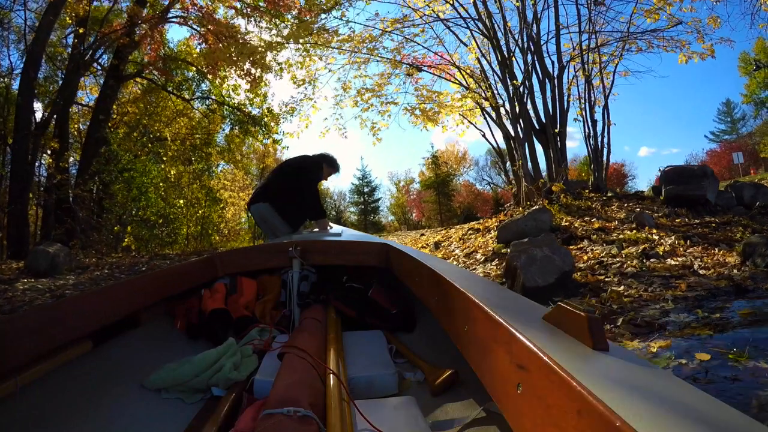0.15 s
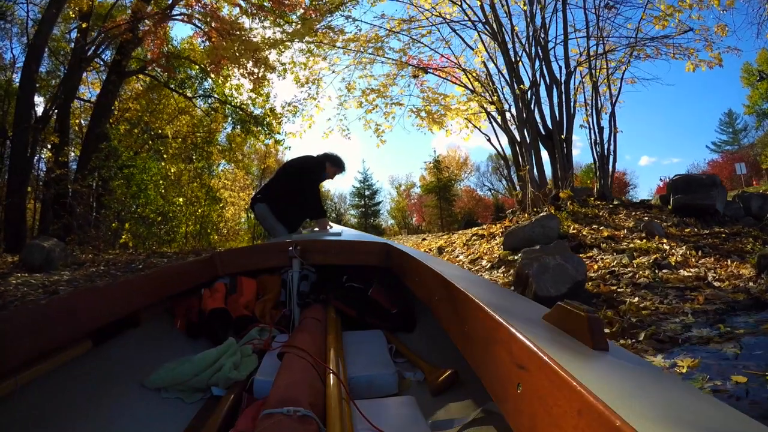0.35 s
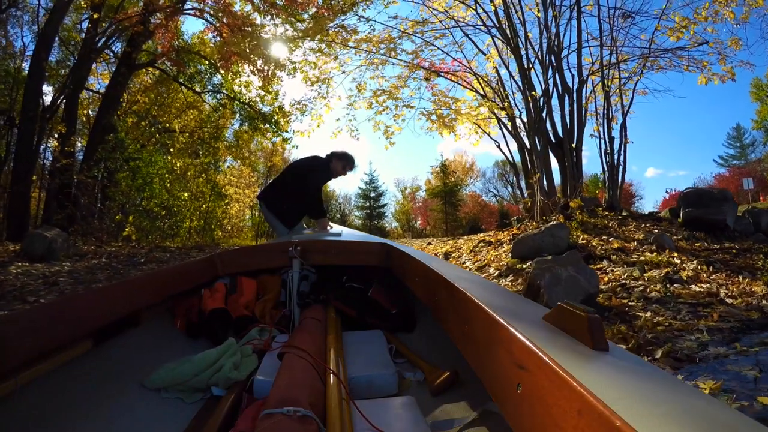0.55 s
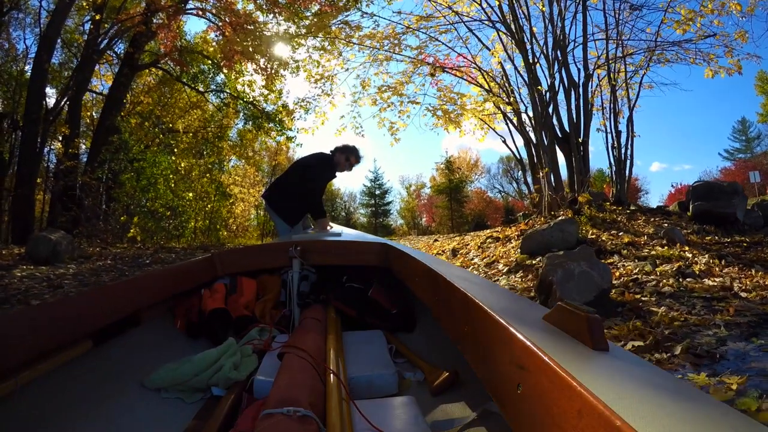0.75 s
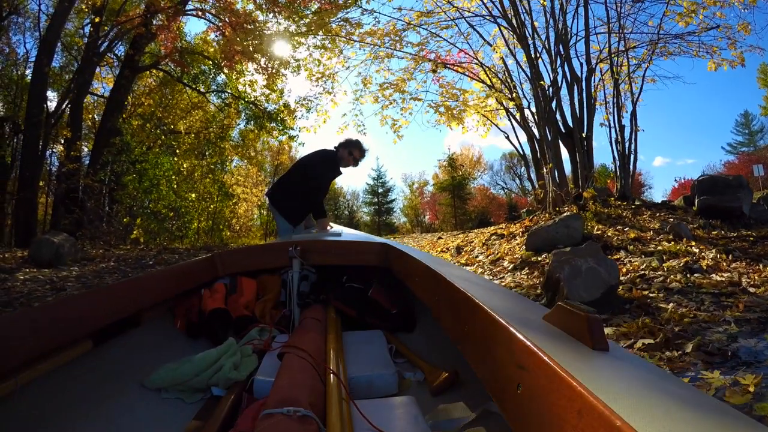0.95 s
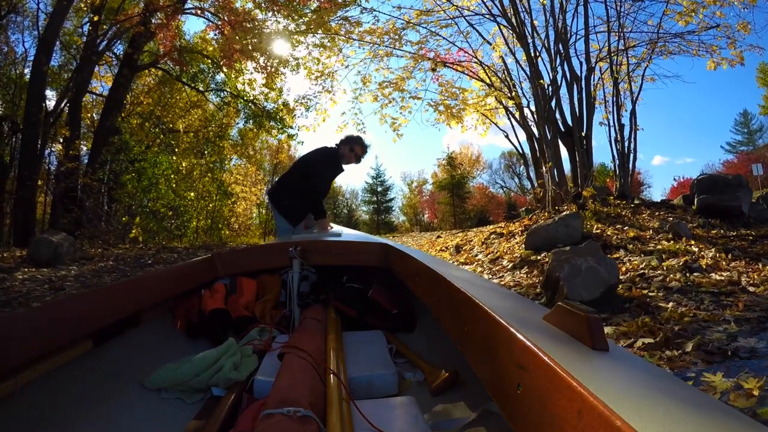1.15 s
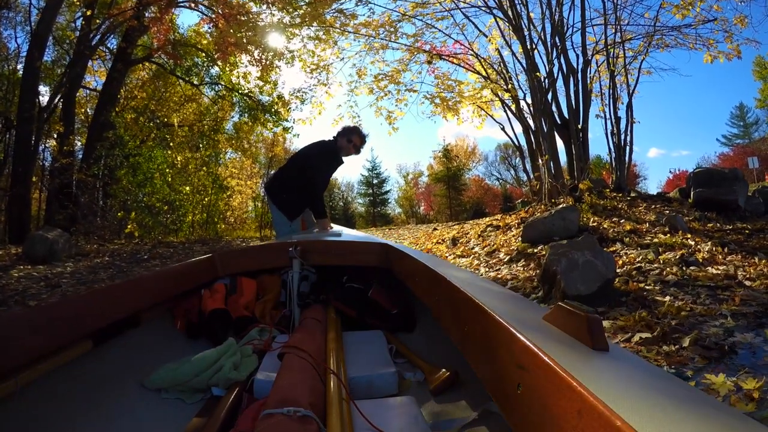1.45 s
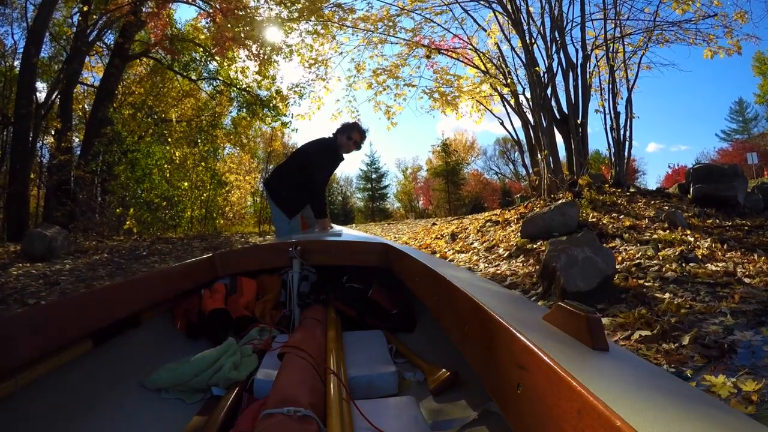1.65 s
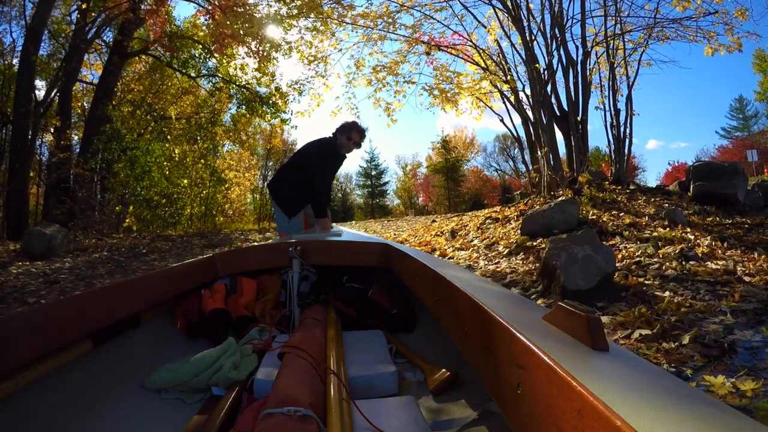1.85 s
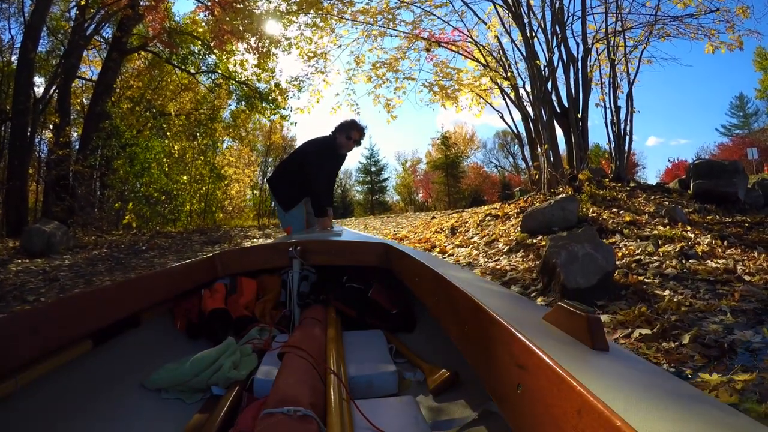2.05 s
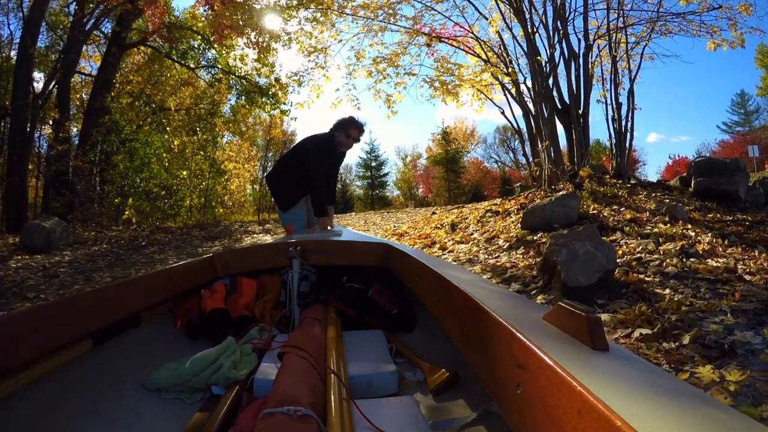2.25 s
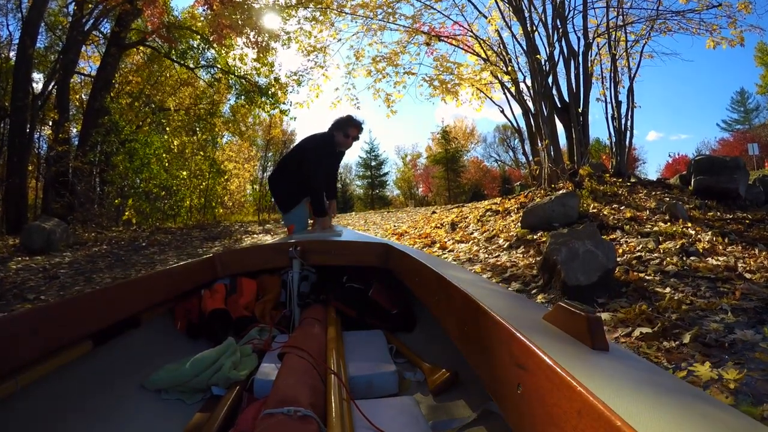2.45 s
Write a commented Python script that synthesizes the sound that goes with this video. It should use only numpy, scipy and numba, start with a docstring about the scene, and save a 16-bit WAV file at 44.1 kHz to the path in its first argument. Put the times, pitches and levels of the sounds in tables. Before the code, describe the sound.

A small wooden boat scrapes onto a leafy bank, heard from inside the hull. Gritty grating swells at once; at 0.2 s a heavy, cracking thump booms, by far the loudest. Scraping and low rumble fade until about 1.1 s, with knocks at 0.4, 0.7 and 0.8 s and a faint squeak at 0.9. After near quiet, soft clunks and rattles come at 1.6-2.0 and 2.3-2.5 s over faint wind and hiss.

```python
"""Scrapes, thumps and knocks: a small wooden boat dragged up a leafy bank, heard from inside the hull.
The keel's friction is noise in moving resonances; the ground's pushes and bumps excite the hull modes.
Loose gear rattles against the ringing planks, fittings and dry leaves tick in resonances of their own,
and a hand squeaks on the varnish by stick-slip, a wavering tone with two overtones.
Faint wind in the trees and microphone hiss, as shaped noise, lie underneath."""
import sys
import numpy as np
from scipy import signal
from scipy.fft import rfft, irfft
from scipy.io import wavfile
from scipy.ndimage import uniform_filter1d
from numba import njit

SR = 44100
rng = np.random.default_rng(int(sys.argv[2]) if len(sys.argv) > 2 else 0)


def boost_factor(decibels):
    """Convert a level in decibels to a linear amplitude factor."""
    exponent = np.asarray(decibels, float) / 20
    return 10 ** exponent


def persist_wave(psi):
    """Save psi, clipped to +-1, as 16-bit WAV."""
    counts = np.round(np.clip(psi, -1, 1) * 32767).astype(np.int16)
    wavfile.write(sys.argv[1], SR, np.atleast_2d(counts).T)


N = 114660  # length in samples

# low modes of the whole hull, levels relative to each other: mode_hz, level_db, t60_s
HULL_MODES = [(97.6, -14.5, 0.35), (106.2, -1, 0.098), (132.7, -14.5, 0.196), (141.3, -2, 0.045),
              (204.6, -9, 0.12), (263, -12.5, 0.11)]
# modes of planks and deck, levels relative to each other: mode_hz, level_db, t60_s
PLANK_MODES = [(359, 26, 0.031), (399, 28.5, 0.013), (556, 19, 0.029), (633, -17, 0.19), (818, 12, 0.016),
               (992, 9, 0.02), (1222, 3, 0.053), (1335, 0.5, 0.096), (1489, 8, 0.023), (1735, 7.5, 0.013),
               (1990, 4, 0.012), (2540, 0.5, 0.0057), (2816, -21, 0.019)]


def times():
    """Sampling: the time in seconds of every sample."""
    return np.arange(N) / SR


def curve(table, column):
    """Linear interpolation: one column of a table followed over time, column 0 being time in s."""
    return np.interp(times(), [row[0] for row in table], [row[column] for row in table])


def unit(x):
    """Normalisation: scales a signal to rms 1."""
    return x / np.sqrt(np.mean(x ** 2))


def ring(modes):
    """Modal superposition: the impulse response is a sum of decaying sines, scaled to peak 1."""
    t = times()[:SR // 2]
    response = sum(boost_factor(db) * np.sin(2 * np.pi * hz * t) * 1000 ** (-t / t60) for hz, db, t60 in modes)
    return response / np.abs(response).max()


def conv(x, response):
    """Linear superposition: convolves a force with a response, cut to the force's length."""
    return signal.fftconvolve(x, response)[:len(x)]


@njit
def svf(x, hz, width):
    """State-variable resonance: two integrators in a loop form a band-pass with a moving centre."""
    out, band_state, low_state = np.empty(len(x)), 0., 0.
    for i in range(len(x)):
        g = np.tan(np.pi * hz[i] / SR)
        damping = width[i] / hz[i]
        v = (band_state + g * (x[i] - low_state)) / (1 + g * (g + damping))
        band_state = 2 * v - band_state
        low_state = low_state + 2 * g * v
        out[i] = damping * v
    return out


def band(x, hz, width):
    """Cascaded resonance: the band-pass applied twice for steeper skirts."""
    hz = np.clip(hz + 0. * x, 20, .45 * SR)
    width = width + 0. * x
    return svf(svf(x, hz, width), hz, width)


def grit(size, spread_db):
    """Granular contact: noise whose samples vary much in size."""
    return rng.standard_normal(size) * boost_factor(spread_db * rng.exponential(size=size))


def walk(rate_hz):
    """Slow random modulation: levels held 1 / rate_hz s and slewed, with a spread near 1."""
    hold = int(SR / rate_hz)
    steps = np.repeat(rng.standard_normal(N // hold + 1), hold)
    slewed = uniform_filter1d(uniform_filter1d(steps, hold), hold)
    return 1.3 * slewed[:N]  # restores spread lost in slewing


def burst(ms, spread_db):
    """Rattling contact: gritty noise starts suddenly, sinks slowly for ms, then dies faster."""
    t_ms = times()[:8192] * 1000
    start = np.minimum(t_ms / .6, 1)
    fall = np.exp(-t_ms / ms * 0.5 - np.maximum(t_ms - ms, 0) / ms)
    return grit(len(t_ms), spread_db) * start * fall


def add(out, start_s, y, peak_db):
    """Superposition: mixes an event in at its time and peak level."""
    i = int(start_s * SR)
    y = y[:N - i]
    out[i:i + len(y)] += y * boost_factor(peak_db) / np.abs(y).max()


def air():
    """Spectral shaping: white noise takes the colour of wind in the trees and microphone hiss."""
    # colour of the background, levels relative to each other: hz, level_db
    colour = [(15, -25), (25, 3), (200, -10.5), (320, -35), (550, -19), (1070, -22.5), (3240, -21),
              (8000, -31.5), (11500, -34), (15500, -42), (15900, -68)]
    hz = np.maximum(np.arange(N // 2 + 1) * SR / N, 1)
    db = np.interp(np.log(hz), np.log([row[0] for row in colour]), [row[1] for row in colour])
    noise = irfft(rfft(rng.standard_normal(N)) * boost_factor(db), N)
    return unit(noise) * boost_factor(-45.5 + 0.09 * walk(10.4))


def scrape():
    """Sliding friction: keel on leaves and grit, in moving resonances, also shakes the planks."""
    # keel over leaves and grit: time_s, level_db, centre_hz
    keel = [(0, -46, 2920), (.06, -43, 3200), (.1, -37, 3450), (.15, -30, 4090), (.175, -58.5, 4600),
            (.21, -38, 2800), (.28, -38.5, 2200), (.38, -42, 1970), (.46, -43, 1970), (.53, -39.5, 2310),
            (.62, -43, 2110), (.66, -42, 1740), (.76, -46, 2200), (.84, -49, 2060), (.95, -51, 2630),
            (1.15, -59, 2540)]
    # narrow resonances: ratios to the moving centre
    streak_ratios = (.7, .93, 1.1, 1.4)
    hz = curve(keel, 2)
    grains = grit(N, 2.1) * boost_factor(1.5 * walk(80))
    broad = unit(band(band(grains, hz, 2.05 * hz), 1700, 10000))
    shaken_planks = boost_factor(-14.5) * unit(conv(grains, ring(PLANK_MODES)))
    # each streak flickers on its own
    streaks = sum(band(grains, ratio * hz, .09 * hz) * boost_factor(4 * walk(70)) for ratio in streak_ratios)
    return (broad + shaken_planks + boost_factor(-7.5) * unit(streaks)) * boost_factor(curve(keel, 1))


def leaf_hiss():
    """Many small contacts: sliding leaves give a fine, bright, uneven hiss."""
    # fine hiss of sliding leaves: time_s, level_db
    hiss_level = [(0, -60), (.1, -55), (.15, -45), (.18, -52), (.25, -45.5), (.5, -52.5), (.85, -50),
                  (.98, -61), (1.2, -77)]
    leaves = grit(N, 1.2) * boost_factor(.8 * walk(40))
    return unit(band(leaves, 10700, 11000)) * boost_factor(curve(hiss_level, 1))


def rumble():
    """Forced vibration: bumps of the ground excite the hull modes and two low bands."""
    # hull rumbling over the ground: time_s, level_db
    rumble_level = [(0, -44.5), (.13, -33.5), (.3, -26), (.45, -33), (.6, -35.5), (.75, -36.5),
                    (.88, -38.5), (1.02, -43.5), (1.2, -49.5), (1.5, -51), (1.7, -47), (1.82, -42.5),
                    (2.02, -42.5), (2.2, -52.5), (2.4, -41), (2.53, -42), (2.58, -51.5)]
    bumps = grit(N, 2.) * boost_factor(2. * walk(40))
    modes = unit(conv(bumps, ring(HULL_MODES)))
    deep = boost_factor(-12) * unit(band(grit(N, 4.2), 20.0, 89))
    low = boost_factor(-3.0) * unit(band(bumps, 171, 418))
    return (modes + deep + low) * boost_factor(curve(rumble_level, 1))


def rubs():
    """Resonant friction: brief singing rubs of the keel, narrow noise that swells and fades."""
    # rubs: start_s, length_ms, level_db, centre_hz
    rub_table = [(.02, 81, -43, 3330), (.075, 33, -40, 3700), (.125, 57, -39, 4780), (.11, 96, -48, 2750),
                 (0.488, 41, -40.5, 2240), (.515, 25, -45.5, 3900), (.575, 65, -42, 2380),
                 (.53, 55, -45, 1325), (.632, 62, -42.5, 1047), (.69, 26, -40, 1350),
                 (0.894, 38, -48.5, 1530), (1.10, 43, -47, 1274)]
    out = np.zeros(N)
    for start_s, ms, db, hz in rub_table:
        swell = np.sin(np.pi * np.clip((times() - start_s) * 1000 / ms, 0, 1))
        out += unit(band(grit(N, 1.3), hz, .075 * hz)) * swell * boost_factor(db)
    return out


def knocks():
    """Impact excitation: a rattle, coloured by contact hardness, cracks and rings the planks."""
    # knocks on the planks: start_s, peak_db, rattle_ms, centre_hz, crack_db (dry crack over ringing)
    knock_table = [(0.031, -28.5, 11.6, 1750, -3), (0.2103, -2, 8.6, 1646, 6), (.217, -11.5, 32, 535, 4),
                   (.245, -10.5, 7.6, 1330, 1.5), (.404, -19, 7.3, 1890, -0.5),
                   (0.677, -22, 7.6, 1680, -0.5), (.781, -23.5, 8.7, 1120, 5), (.793, -23.5, 10.5, 1620, 3),
                   (0.805, -23, 14.4, 1670, 0), (1.096, -31, 18, 600, 8), (1.606, -26.5, 19, 560, -7),
                   (1.75, -23, 22.6, 990, 5.5), (1.773, -27, 7.8, 1600, 6), (1.765, -28.5, 35, 410, -2.5),
                   (1.875, -20.5, 10.6, 960, 2), (1.937, -24.5, 20, 530, 6.5), (2.01, -37.5, 16, 1190, 17),
                   (2.117, -38, 16, 397, -1), (2.27, -39.5, 20, 705, 0), (2.333, -25.5, 8.5, 1710, 2.5),
                   (2.337, -25, 17, 540, -3.5), (2.401, -35.5, 20, 1750, -1.5), (2.426, -31, 23, 1230, 3),
                   (2.423, -24, 7, 385, -15), (2.452, -21, 20, 250, 1), (2.464, -35, 11, 550, -9)]
    out, planks = np.zeros(N), ring(PLANK_MODES)
    for start_s, db, ms, hz, crack_db in knock_table:
        width_hz = np.clip(0.82 + 0.053 * crack_db, .25, 1.5) * hz  # hollow knocks are narrow
        hit = band(burst(ms, 0.88), hz, width_hz)
        hit = signal.sosfilt(signal.butter(2, min(3.03 * hz, 9000), fs=SR, output="sos"), hit)
        add(out, start_s, boost_factor(crack_db) * unit(hit) + unit(conv(hit, planks)), db)
    return out


def ticks():
    """Local resonance: fittings and dry leaves give short bright rattles, each in its own band."""
    # ticks: start_s, peak_db, length_ms, centre_hz, width_hz
    tick_table = [(0.2108, -26, 4.1, 11500, 1500), (0.227, -22, 7.7, 6550, 1230),
                  (.775, -28.5, 6.7, 6960, 4000), (0.809, -37, 20, 7040, 6000),
                  (1.078, -42.5, 6.4, 11900, 2500), (1.067, -36.5, 13, 5070, 700),
                  (1.776, -38, 10, 4480, 7000), (1.862, -43, 5.1, 11300, 5000),
                  (1.87, -28.5, 6.5, 3460, 400), (1.88, -34, 10, 7000, 8000), (1.909, -30, 9.2, 5400, 2220),
                  (1.91, -39, 6.7, 11800, 6000), (1.939, -41, 8, 7650, 9000),
                  (2.429, -27.5, 5.2, 3500, 397)]
    out = np.zeros(N)
    for start_s, db, ms, hz, width_hz in tick_table:
        add(out, start_s, band(burst(ms, 0.66), hz, width_hz), db)
    return out


def hull_tail(hits):
    """Reverberation: exponentially decaying noise is the short response inside the open hull."""
    t60_s, tail_db = 0.39, -16.5
    t = times()[:SR // 2]
    tail = band(rng.standard_normal(len(t)), 2260, 8400) * 1000 ** (-t / t60_s)
    return boost_factor(tail_db) * conv(hits, tail / np.sqrt(np.sum(tail ** 2)))


def thumps():
    """Modal excitation: a soft push jolts the mount, and the hull's boom builds up and dies."""
    # thumps of the hull: start_s, boom_db, push_ms, jolt_db, direction (+1 or -1)
    thump_table = [(0.222, 1.5, 4.25, -44, 1), (.41, -21.5, 0.98, -55, 1), (0.784, -26, 4.5, -39, 1),
                   (0.803, -17.5, 2.47, -12.5, 1), (0.817, -19, 4.2, -44, 1), (0.8308, -45, 3.5, -13, 1),
                   (0.956, -65, 5.9, -20, -1), (1.052, -38, 5.3, -23.5, -1), (1.1, -26.5, 4.5, -25, -1),
                   (1.947, -34, 6.4, -25.5, 1), (2.301, -45, 20, -21, 1), (2.323, -23, 16.7, -22, -1),
                   (2.3442, -31, 7, -7.5, 1), (2.375, -23.5, 5.7, -20.5, 1), (2.451, -47, 4.1, -15.5, 1),
                   (2.49, -25.5, 3.7, -29, 1)]
    boom_rise_ms = 6.7
    out, boom = np.zeros(N), ring(HULL_MODES)
    t_ms = times()[:SR // 2] * 1000
    build_up = (1 - np.exp(-t_ms / boom_rise_ms)) ** 2
    for start_s, boom_db, ms, jolt_db, direction in thump_table:
        push = direction * np.sin(np.pi * np.minimum(t_ms / ms, 1)) ** 2
        add(out, start_s, conv(push, boom) * build_up, boom_db)
        add(out, start_s, push, jolt_db)
    return signal.sosfilt(signal.butter(2, 25, "high", fs=SR, output="sos"), out)


def squeak():
    """Stick-slip: a hand on varnish gives a wavering, flickering tone with two overtones."""
    # squeak: time_s, pitch_hz, level_db
    glide = [(.878, 4750, -56), (.89, 4400, -49), (.9, 3900, -48), (.918, 3800, -43), (.926, 3480, -44),
             (.936, 3340, -45), (.955, 3350, -45), (.97, 3600, -48), (.985, 3750, -62)]
    # second and third harmonics relative to the fundamental: level_db
    overtones_db = (-12, -7)
    pitch_hz = curve(glide, 1) * (1 + .024 * walk(850))
    phase = 2 * np.pi * np.cumsum(pitch_hz) / SR
    overtones = sum(boost_factor(db) * np.sin((k + 2) * phase) for k, db in enumerate(overtones_db))
    tone = np.sqrt(2) * (np.sin(phase) + overtones)  # fundamental at rms 1
    on = (times() > glide[0][0]) & (times() < glide[-1][0])
    return tone * on * boost_factor(curve(glide, 2) + 3 * walk(440))


def scene():
    """Superposition: all sources add, and the knocks and ticks leave a tail in the hull."""
    hits = knocks() + ticks()
    hits = hits + hull_tail(hits)
    drag = scrape() + leaf_hiss() + rumble()
    return (air() + drag + rubs() + hits + thumps() + squeak())[None]


def low_pass(x):
    """Removes everything above the highest recorded frequency."""
    return signal.sosfilt(signal.butter(12, 16120, fs=SR, output="sos"), x)


def record(dry):
    """Soft saturation: a hyperbolic tangent rounds the loudest peak."""
    mix = np.tanh(0.59 * dry) / 0.74
    return low_pass(mix)


dry = scene()
out = record(dry)
persist_wave(out)
```